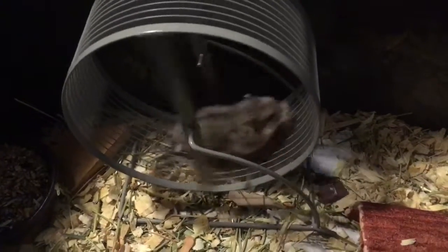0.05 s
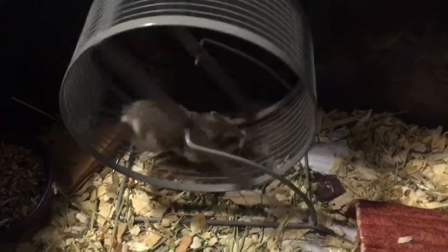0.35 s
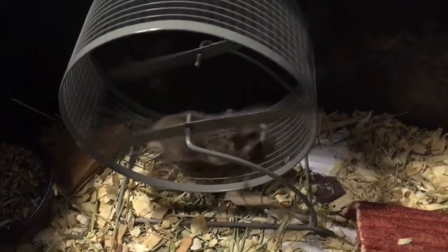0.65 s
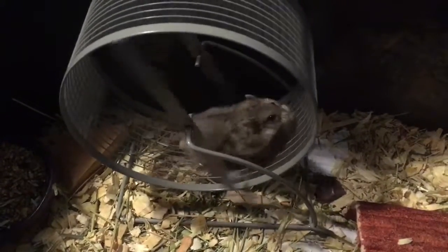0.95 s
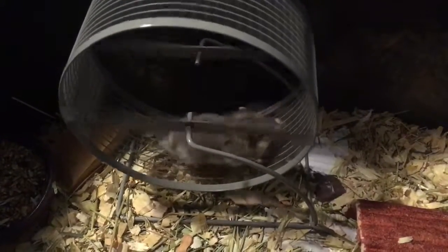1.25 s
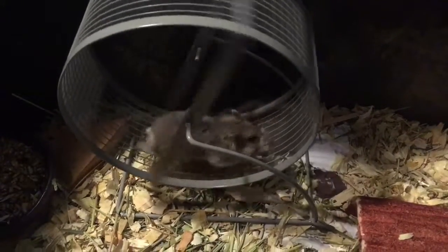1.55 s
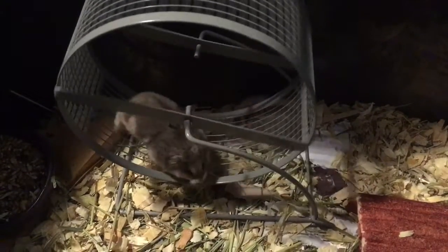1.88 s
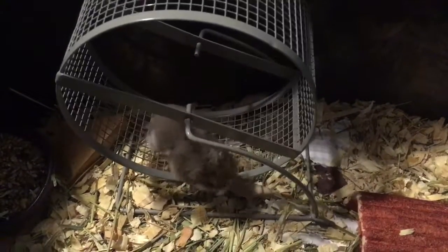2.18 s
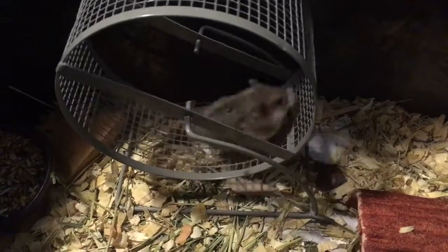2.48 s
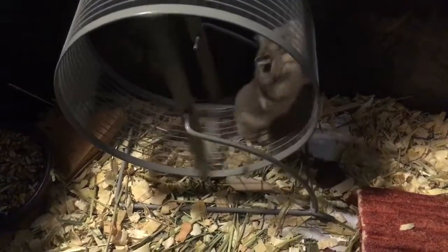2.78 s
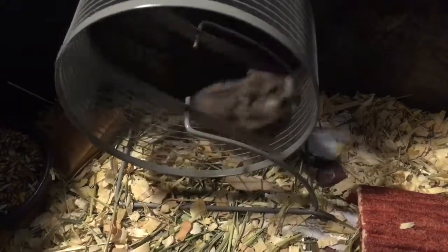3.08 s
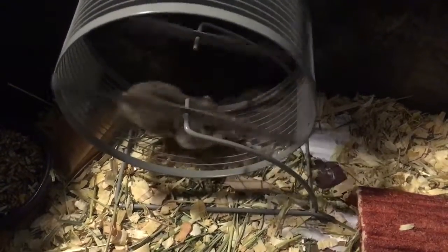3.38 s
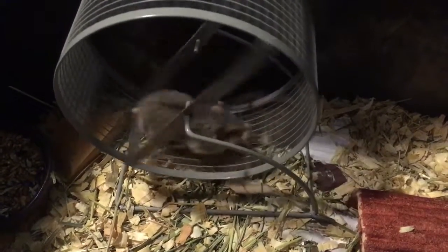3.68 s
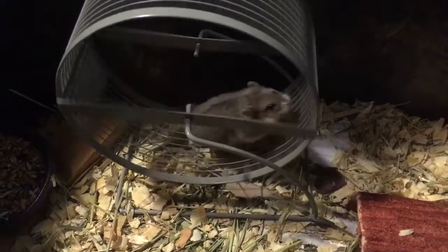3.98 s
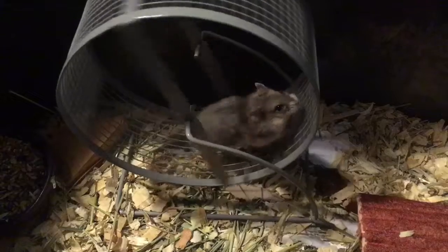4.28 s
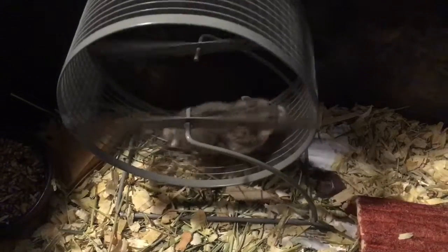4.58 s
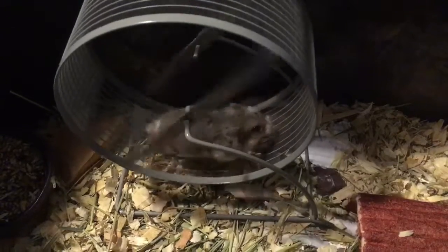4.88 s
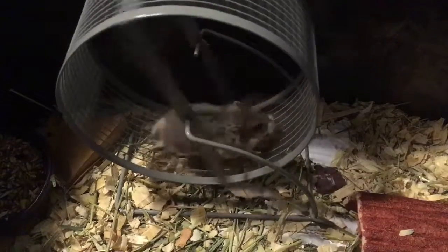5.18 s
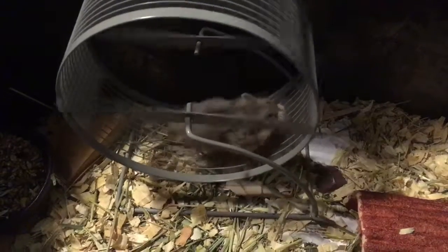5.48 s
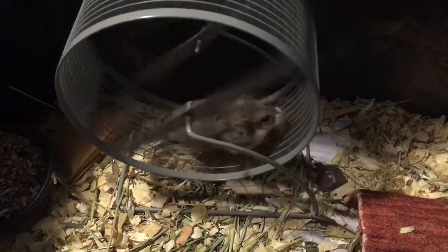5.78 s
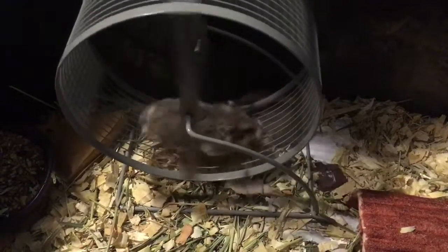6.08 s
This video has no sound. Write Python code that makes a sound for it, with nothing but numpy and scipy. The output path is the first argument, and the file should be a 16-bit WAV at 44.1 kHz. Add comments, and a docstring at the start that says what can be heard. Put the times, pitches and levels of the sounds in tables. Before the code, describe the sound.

A wire hamster wheel gives short, high squeaks and creaks as it turns, over faint pattering paws and a few soft bumps.

```python
"""A wire hamster wheel squeaks as dwarf hamsters run in it, close to a small microphone in a quiet room.
Its dry axle sticks and slips in short, partly rasping creaks, squeals, chirps and hoots that ring
through the steel wire. Paws patter and tick on the mesh and the wood shavings, footfalls rumble
through the stand, and now and then the stand bumps the enclosure floor. Faint air and hum lie beneath."""
import sys
import numpy as np
from scipy import signal
from scipy.fft import rfft, irfft
from scipy.io import wavfile

SR = 44100
rng = np.random.default_rng(int(sys.argv[2]) if len(sys.argv) > 2 else 0)


def materialize(psi):
    """Save the field psi as 16-bit PCM at rate SR to the path in sys.argv[1].

    A 1-D psi becomes a single channel; in a 2-D psi each row is a channel.
    """
    bounded = np.clip(np.atleast_2d(psi).T, -1, 1)
    quanta = np.round(bounded * 32767).astype(np.int16)
    wavfile.write(sys.argv[1], SR, quanta)


N = 275625
TIME = np.arange(N) / SR


def undb(db):
    """Decibels to gain."""
    return 10 ** (np.asarray(db) / 20)


def unit(x):
    """Scale to rms 1."""
    return x / np.sqrt(np.mean(x ** 2))


def colour(x, points):
    """EQ a sound with a curve of (freq_hz, gain_db) points, at rms 1."""
    hz, db = np.transpose(points)
    bins_hz = np.maximum(np.fft.rfftfreq(N, 1 / SR), 1)
    curve = undb(np.interp(np.log(bins_hz), np.log(hz), db))
    return unit(irfft(rfft(x) * curve, N))


def noise(points):
    """Noise through an EQ curve, at rms 1."""
    return colour(rng.standard_normal(N), points)


def wander(t, rate):
    """Random values, rate a second, joined by lines."""
    return np.interp(t * rate, np.arange(4096), rng.standard_normal(4096))


def ramp(u):
    """Smooth step from 0 to 1."""
    return np.sin(np.pi / 2 * np.clip(u, 0, 1)) ** 2


def fade(t, t60):
    """Exponential decay that begins at t = 0."""
    return (t >= 0) * np.exp(-np.log(1000) * np.maximum(t, 0) / t60)


def add(track, start_s, sound):
    """Mix a sound into a track."""
    i = max(int(start_s * SR), 0)
    track[..., i:i + sound.shape[-1]] += sound[..., :N - i]


def blows(hits, t60_s, crack=0):
    """Envelope of sudden (start_s, level_db) hits dying away, each with an optional 20 ms crack."""
    envelope, t = np.zeros(N), TIME[:SR // 4]
    for start_s, db in hits:
        add(envelope, start_s, undb(db) * (fade(t, t60_s) + crack * fade(t, 0.02)))
    return envelope


def note(start_s, length_s, hz, db, second_db, third_db, rough,
         settle_s=1, rise_s=0.008, fall_s=0.009, drift_hz=35, slip_hz=170, upper_db=-13):
    """One stick-slip note as (start, [tone, fundamental, grit]); a pair of values is (first, settled)."""
    # smooth notes build up and let go slowly, rough ones bite at once
    slow_s = 0.45 * length_s * max(1 - np.max(rough), 0) ** 2
    rise, fall = rise_s + slow_s, fall_s + slow_s
    t = TIME[:int((length_s + rise / 2 + fall / 2) * SR)]
    envelope = undb(db) * ramp(t / rise) * ramp((t[-1] - t) / fall)
    settled = ramp((t - rise / 2) / settle_s)
    hz, second_db, third_db, rough = (np.interp(settled, [0, 1], np.resize(value, 2))
                                      for value in (hz, second_db, third_db, rough))
    # uneven slips shake the pitch and the level
    chatter = np.clip(rough, 0, 1) ** 2
    pitch_hz = hz + chatter * slip_hz * wander(t, 1500) + rough * drift_hz * wander(t, 145.6)
    phase = 2 * np.pi * np.cumsum(pitch_hz) / SR
    level = np.sqrt(2) * envelope * (1 + 1.1 * chatter * wander(t, 700))
    level *= undb((2 + 2.5 * rough) * wander(t, 210))  # even a smooth note wavers a little
    harmonics_db = [0, second_db, third_db, third_db + upper_db, third_db + 2 * upper_db]
    wave = sum(undb(gain_db) * np.sin(k * phase)
               for k, gain_db in enumerate(harmonics_db, 1) if k * hz[0] < SR / 2)
    grit = envelope * chatter * (1 + undb(second_db))  # bright, rough notes grind most
    return start_s - rise / 2, np.array([level * wave, level * np.exp(1j * phase), grit])


def play(notes):
    """Lay notes out on three tracks: tone, complex fundamental and grit envelope."""
    tracks = np.zeros((3, N), complex)
    for start_s, sound in notes:
        add(tracks, start_s, sound)
    return tracks


# EQ of the still air: freq_hz, gain_db
AIR_EQ = [(15, -54.5), (25, -17), (92, 2.5), (134, 1.5), (285, -10), (405, -10), (463, -15), (734, -20),
          (1700, -21), (3080, -27.5), (3340, -25.5), (3920, -30), (8140, -31.5), (10700, -31), (16000, -73)]
# Mains hum: pitch_hz, level_db
MAINS_HUM = [(120, -75)]
def room_tone(air_db=-68.5):
    """A steady bed of air and mains hum."""
    hum = sum(np.sqrt(2) * undb(db) * np.sin(2 * np.pi * hz * TIME) for hz, db in MAINS_HUM)
    return undb(air_db) * noise(AIR_EQ) + hum


# How hard the paws work the mesh and shavings: time_s, level_db
EFFORT = [(0, -73), (.27, -77), (.52, -84), (.83, -73), (1.12, -77), (1.28, -74), (1.7, -78.5), (1.85, -80),
          (2.2, -77.5), (2.52, -79), (2.7, -82.5), (2.92, -79.5), (3.4, -81.5), (4.15, -95), (4.65, -85),
          (4.9, -76.5), (5.12, -92), (5.5, -72.5), (5.85, -89.5), (6.25, -89.5)]
# EQ of claws and shavings: freq_hz, gain_db
PAW_EQ = [(150, -15.5), (400, 6), (1000, 7), (2000, 5), (4000, -2), (7000, -3), (10500, 3), (12500, -10),
          (16000, -21)]
def paws(clicks_per_s=600, spread_db=5.5, step_db=5.5, trim_db=-3):
    """Dense tiny clicks of claws and shavings, bunched by quick steps."""
    fires = rng.random(N) < clicks_per_s / SR
    strength = undb(spread_db * np.minimum(rng.exponential(size=N), 3.5))
    clicks = fires * strength * np.sign(rng.standard_normal(N))
    scratch = rng.standard_normal(SR // 50) * fade(TIME[:SR // 50], 0.0019)
    patter = colour(signal.fftconvolve(clicks, scratch)[:N], PAW_EQ)
    effort_db = np.interp(TIME, *np.transpose(EFFORT)) + step_db * wander(TIME, 45) + trim_db
    # each shudder of the stand stirs the shavings, and a scuff trails each accent tick
    stir = blows([(start_s, -66.5) for start_s, _ in SHUDDERS], t60_s=0.3)
    scuffs = blows([(start_s, -75.5) for start_s, _ in ACCENT_TICKS], t60_s=0.12)
    return patter * (undb(effort_db) + stir + scuffs)


def rumble(level_db=-70, follow=0.59, sway_db=2):
    """Footfalls drum dully through the stand, more when the animals work harder."""
    effort_db = np.interp(TIME, *np.transpose(EFFORT))
    body = noise([(25, -28.5), (55, 3), (90, -5), (150, 0.5), (240, -2.5), (500, -26), (1500, -32)])
    return body * undb(level_db + follow * (effort_db - effort_db.mean()) + sway_db * wander(TIME, 16))


# The standout hits of claws and chips on the mesh: start_s, level_db
ACCENT_TICKS = [(0.5565, -44.5), (1.319, -59), (1.449, -69), (1.458, -75), (1.9164, -64), (1.991, -64),
                (2.099, -60.5), (2.119, -66), (2.2644, -63), (2.381, -60.5), (2.4456, -64), (2.684, -68),
                (2.856, -66), (2.9222, -66.5), (3.1026, -69.5), (3.156, -73), (5.621, -72)]
def ticks(small_per_s=18, over_effort_db=4, room_share=0.4):
    """Sharp ticks on the mesh, accents among small random ones, so close that they stay nearly dry."""
    starts_s = rng.random(int(small_per_s * N / SR)) * TIME[-1]
    small = zip(starts_s, np.interp(starts_s, *np.transpose(EFFORT)) + over_effort_db)
    direct = blows([*ACCENT_TICKS, *small], t60_s=0.0082, crack=0.83) * noise(PAW_EQ)
    return direct + room_share * (room(direct) - direct)


# Peeps of wheel and stand: start_s, length_s, pitch_hz, level_db, octave_db, roughness (0-1)
WIRE_PEEPS = [(.008, 0.031, 4543, -49, 8, 0.49), (.01, .05, 5110, -55.5, -18.5, 0),
              (0.022, 0.026, 2307, -56.5, -2, .25), (0.027, 0.044, 4620, -49.5, -2.5, .8),
              (0.406, 0.023, 1730, -62.5, -20, .24), (.441, 0.016, 1663, -49.5, -16, 0.34),
              (1.501, 0.016, 1635, -59, -19, .15), (3.328, 0.14, 4630, -83, -16, 0.35),
              (3.331, .04, 5190, -70.5, -24, 0.5), (3.46, 0.022, 5440, -60, -21, 0.4),
              (4.05, 0.012, 2444, -73, -13, 0.17), (4.847, .022, 4550, -56, -9, 0.8),
              (4.876, .076, 4556, -64.5, -42, 0.09), (5.394, 0.079, 4550, -74.5, -28, 0.33),
              (5.459, 0.08, 2044, -66.5, -4.5, 0.69), (5.509, .08, 2019, -65, -28, 0.25),
              (5.963, 0.02, 1682, -74.5, -28.5, .1), (6.099, 0.024, 1690, -79, -7, .2)]
def peeps():
    """Light rubbing sets single wires singing, each on one pitch."""
    return play([note(start_s, length_s, hz, db, octave_db, octave_db - 11, rough)
                 for start_s, length_s, hz, db, octave_db, rough in WIRE_PEEPS])


# Bites of the loaded axle: start_s, length_s, level_db, overtones_db, glide_hz
AXLE_CREAKS = [(0.051, 0.027, -44.5, -4.5, -65), (0.875, 0.015, -46, -15, 50),
               (0.931, 0.013, -50.5, -8, 206), (1.944, 0.03, -54.5, -13.5, 100),
               (3.477, .01, -41.5, -4.5, -56), (3.51, 0.027, -44.5, -8, -7), (4.731, 0.028, -45, -5.5, 105),
               (4.76, .036, -42.5, -1, 14.5), (4.846, .014, -53, 1, 200), (5.621, 0.011, -54, -21, -33),
               (5.643, 0.017, -45.5, -9, -100)]
def creaks(pitch_hz=3221, rough=0.27, drag_s=0.035, drag_db=-20):
    """The axle sinks onto its resonance or flicks up from it, then drags on more softly."""
    notes = []
    for start_s, length_s, db, bright_db, glide_hz in AXLE_CREAKS:
        slide_hz = (pitch_hz + max(-glide_hz, 0), pitch_hz + max(glide_hz, 0))
        notes.append(note(start_s, length_s, slide_hz, db, bright_db, bright_db, rough,
                          settle_s=0.018, rise_s=0.004, upper_db=-14.5))
        notes.append(note(start_s + length_s, drag_s, pitch_hz, db + drag_db, bright_db, bright_db, rough))
    return play(notes)


# Soft bumps of wheel and bodies: start_s, pitch_hz, level_db
FLOOR_THUMPS = [(0.054, 108, -46.5), (0.16, 121, -50.5), (0.301, 111.5, -45.5), (.316, 52.4, -38.5),
                (0.556, 257, -48.5), (0.567, 105, -45.5), (.846, 149, -53), (0.867, 58.4, -44),
                (1.377, 68.5, -43.5), (1.645, 223, -47.5), (2.273, 210, -56.5), (2.317, 194, -52),
                (2.385, 1116, -55)]
def thumps(rise_cycles=0.93, ring_cycles=16):
    """The floor booms under the wheel; low bumps swell and die more slowly."""
    track, t = np.zeros(N), TIME[:SR // 2]
    for start_s, hz, db in FLOOR_THUMPS:
        rise_s, t60_s = rise_cycles / hz, ring_cycles / hz
        envelope = undb(db) * ramp(t / rise_s) * fade(np.maximum(t - rise_s, 0), t60_s)
        add(track, start_s, envelope * np.sin(2 * np.pi * hz * t))
    return track


# Squeals that break out of creaks: start_s, length_s, level_db, lock_s, attack_roughness (0-1)
AXLE_SQUEALS = [(0.058, 0.049, -44, 0.05, 0.49), (0.125, .044, -59.5, .005, 0),
                (0.958, .04, -51, 0.089, .5), (3.497, 0.058, -48, 0.038, 0.76),
                (3.558, .022, -54, 0.015, 0.42), (4.767, 0.068, -62, 0.2, 0.85),
                (5.645, 0.074, -46.5, .055, 0.6), (5.727, 0.016, -49, 0.021, 0.31)]
def squeals(pitch_hz=5310, full_rough_flat_hz=211, locked_rough=0.14):
    """As the slipping locks, a flat, rasping attack comes up to pitch, clears and the octave takes over."""
    return play([note(start_s, length_s, (pitch_hz - full_rough_flat_hz * rough, pitch_hz), db,
                      second_db=(-1, 13.5), third_db=-19, rough=(rough, locked_rough),
                      settle_s=lock_s, rise_s=0.005, drift_hz=120)
                 for start_s, length_s, db, lock_s, rough in AXLE_SQUEALS])


# Jolts of the stand: start_s, level_db
SHUDDERS = [(0.305, -62), (0.338, -74), (0.834, -80), (1.366, -41), (4.75, -79), (4.859, -75)]
# EQ of the shaken stand: freq_hz, gain_db
SHUDDER_EQ = [(35, -26), (60, 4.5), (306, -8.5), (396, -4), (574, -12), (641, -12), (716, -9.5),
              (786, -18.5), (1200, -22), (5000, -47.5), (6500, -74), (11000, -120)]
def shudders():
    """The stand shudders in the bedding with a dull burst of noise."""
    return blows(SHUDDERS, t60_s=0.25) * noise(SHUDDER_EQ)


# Top-end chirps of the turning axle: start_s, length_s, pitch_hz, level_db, sheen_db, roughness (0-1)
AXLE_CHIRPS = [(0.359, 0.022, 8020, -31.5, -59, 0.32), (1.379, 0.015, 8190, -33, -55, .45),
               (1.407, 0.036, 7970, -41, -75.5, 0.47), (3.157, 0.02, 8003, -34.5, -55, 0.26),
               (4.139, 0.03, 8520, -35, -91, 0.18), (5.129, 0.031, 8350, -63.5, -81, 0.54),
               (6, .036, 8260, -58.5, -75, 0.36)]
def chirps(scoop_hz=225, sheen_hz=(14150, 13900), lead_s=0.014, lead_db=-30):
    """After a faint lead-in the axle scoops up to pitch while a thin overtone, the sheen, slides down."""
    notes = []
    for start_s, length_s, hz, db, sheen_db, rough in AXLE_CHIRPS:
        timbre = dict(second_db=-22, third_db=-40, rough=rough)
        for slide_hz, level_db in (((hz - scoop_hz, hz), db), (sheen_hz, sheen_db)):
            notes.append(note(start_s, length_s, slide_hz, level_db, **timbre,
                              settle_s=0.017, rise_s=0.012, drift_hz=150))
        notes.append(note(start_s - lead_s, lead_s, hz - scoop_hz, db + lead_db, **timbre))
    return play(notes)


# Hoots that follow some chirps: start_s, length_s, level_db, attack_overtones_db
COASTING_HOOTS = [(1.541, 0.056, -62, -3), (4.392, 0.074, -56, -2), (5.257, 0.069, -65.5, -7.5),
                  (6.132, .065, -56.5, 4.5)]
def hoots(pitch_hz=3124, mellow_db=-21, rough=0.22, creep_s=0.029, creep_db=-14.5):
    """The coasting wheel creeps softly into a note that opens bright and mellows as it goes."""
    notes = []
    for start_s, length_s, db, bright_db in COASTING_HOOTS:
        overtones_db = (bright_db, bright_db + mellow_db)
        notes.append(note(start_s - creep_s, creep_s, pitch_hz, db + creep_db, mellow_db, mellow_db, rough))
        notes.append(note(start_s, length_s, pitch_hz, db, overtones_db, overtones_db, rough, settle_s=0.062))
    return play(notes)


# Tails of long squeals: start_s, length_s, level_db, roughness (0-1)
RELEASE_SCRAPES = [(3.612, 0.02, -58, .6), (5.741, 0.022, -53, 0.92)]
def scrapes(pitch_hz=4542, full_rough_fall_hz=604):
    """The axle lets go: the rougher the scrape, the further its pitch falls."""
    return play([note(start_s, length_s, (pitch_hz, pitch_hz - full_rough_fall_hz * rough), db,
                      second_db=2.5, third_db=-22, rough=rough, settle_s=0.0147, rise_s=0.0037)
                 for start_s, length_s, db, rough in RELEASE_SCRAPES])


# EQ of the grinding axle: freq_hz, gain_db
RASP_EQ = [(1000, -21.5), (2500, -17), (4500, -3.5), (6500, 0.5), (8500, 4), (10300, 1), (12000, -1),
           (15500, -9)]
def rasp(envelope, grain_db=3):
    """Grainy metal-on-metal noise that rides an envelope."""
    return envelope * unit(noise(RASP_EQ) * undb(grain_db * wander(TIME, 600)))


# Sum and difference tones of creak and squeal: creak_multiple, squeal_multiple
SIDEBANDS = [(1, 1), (-1, 2), (1, 2), (2, 1), (-1, 3), (3, 1), (-1, 1)]
# Strength of each of those tones: gain_db
SIDEBAND_GAINS = [2.5, -4, -16.5, -14.5, -20, -12, -27.5]
def squeaks(grit_db=-9, clash_db=-10.5):
    """All stick-slip notes; overlapping creak and squeal modulate each other, and uneven slips grind."""
    creak, squeal = creaks(), squeals()
    tones, _, grit = (creak + squeal + chirps() + hoots() + scrapes() + peeps()).real
    low, high = creak[1], squeal[1]  # the two fundamentals
    overlap = np.sqrt(np.abs(low * high))
    for (m, n), db in zip(SIDEBANDS, SIDEBAND_GAINS):
        tones = tones + undb(db) * overlap * np.sin(m * np.angle(low) + n * np.angle(high))
    return tones + rasp(undb(grit_db) * grit + undb(clash_db) * overlap)


# Resonances of wheel and stand: pitch_hz, undamped_t60_s, gain_db
STEEL_MODES = [(1671, 0.19, -7), (2040, 0.56, -3), (2640, 0.25, 2), (3134, 0.39, -1.5), (3177, 0.99, 11),
               (3610, .2, -9), (4390, .2, 7.5), (4600, 0.2, 4), (5100, 0.12, 8), (5290, 0.36, -1.5),
               (6430, .12, -22.5), (7360, 0.1, -7.5), (7630, .14, -7.5), (7850, .12, 8.5),
               (8000, 0.11, -16.5), (9800, 0.16, -3), (10400, .15, -12), (13400, 0.095, -8)]
def wire(x, longest_t60_s=0.3):
    """The axle's vibration passes into the narrow resonances of the steel wire."""
    t = TIME[:SR // 2]
    ring = np.zeros(len(t))
    for hz, t60_s, db in STEEL_MODES:
        decay = fade(t, min(t60_s, longest_t60_s))  # paws and bedding damp the wire
        ring += undb(db) * 2 * decay / decay.sum() * np.cos(2 * np.pi * hz * t)
    return x + signal.fftconvolve(x, ring)[:N]


def room(x, walls_t60_s=0.075, tail_t60_s=0.33, tail_db=-15):
    """Quick reflections from the enclosure walls, then the room's short tail."""
    t = TIME[:SR // 2]
    walls = rng.standard_normal(len(t)) * fade(t - 0.002, walls_t60_s)
    tail = rng.standard_normal(len(t)) * fade(t - 0.008, tail_t60_s)
    response = walls / np.linalg.norm(walls) + undb(tail_db) * tail / np.linalg.norm(tail)
    # furnishings soak up the highest treble
    response = signal.sosfilt(signal.butter(1, 9000, fs=SR, output="sos"), response)
    return x + signal.fftconvolve(x, response)[:N]


def scene(axle_db=-3):
    """Mono mix of wheel and animals over the room tone."""
    wheel = room(undb(axle_db) * wire(squeaks()) + paws())
    return (wheel + ticks() + thumps() + shudders() + rumble() + room_tone())[None]


def record(dry):
    """A low cut at 28 Hz and a steep high cut at 15.9 kHz."""
    low_cut = signal.butter(2, 28, "high", fs=SR, output="sos")
    high_cut = signal.ellip(10, 0.2, 70, 15900, fs=SR, output="sos")
    return signal.sosfilt(high_cut, signal.sosfilt(low_cut, dry))


dry = scene()
out = record(dry)
materialize(out)
```